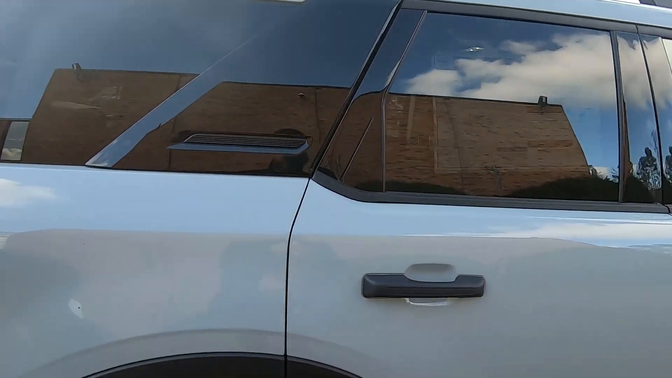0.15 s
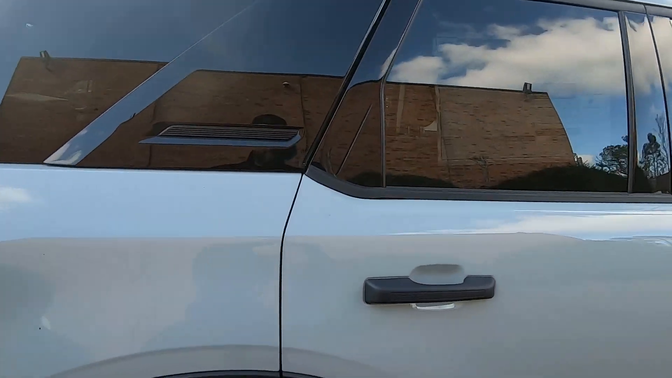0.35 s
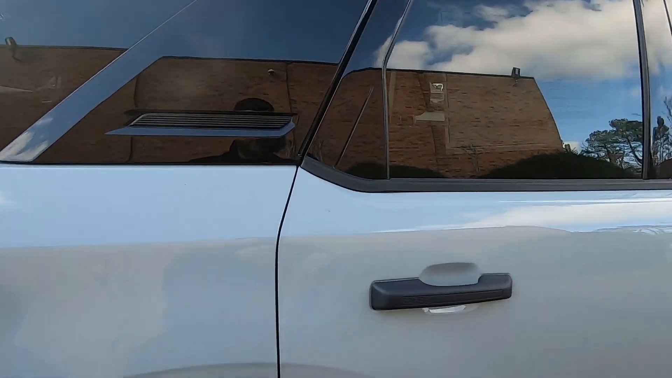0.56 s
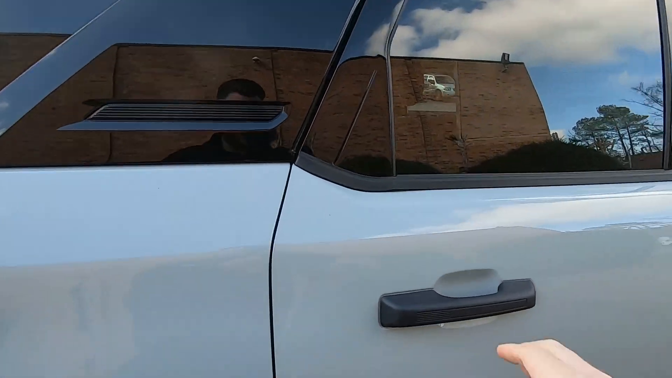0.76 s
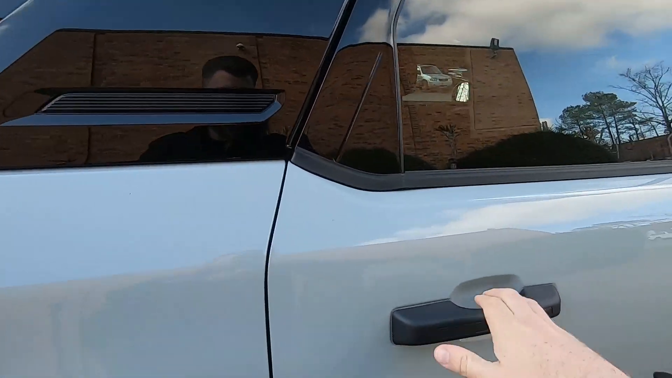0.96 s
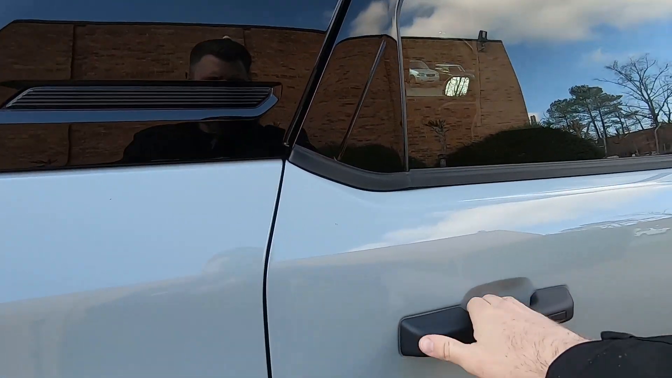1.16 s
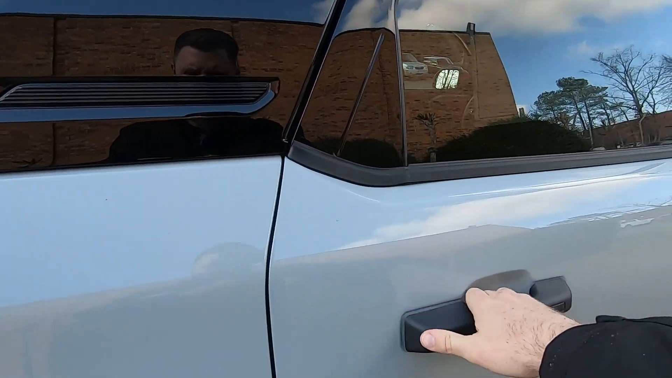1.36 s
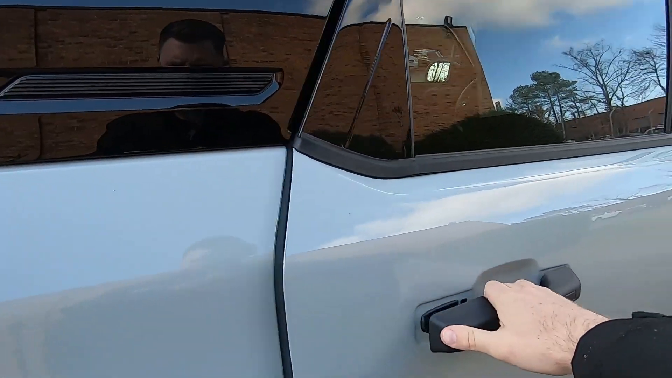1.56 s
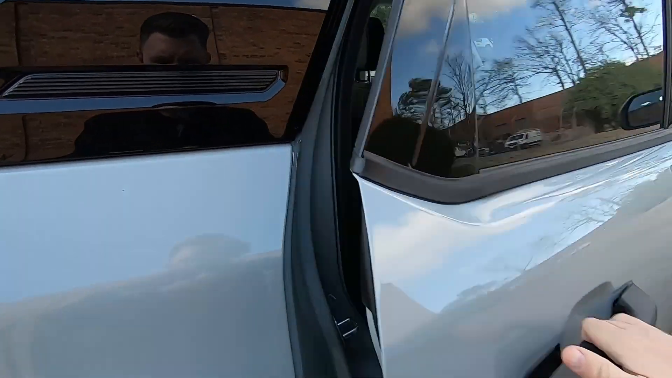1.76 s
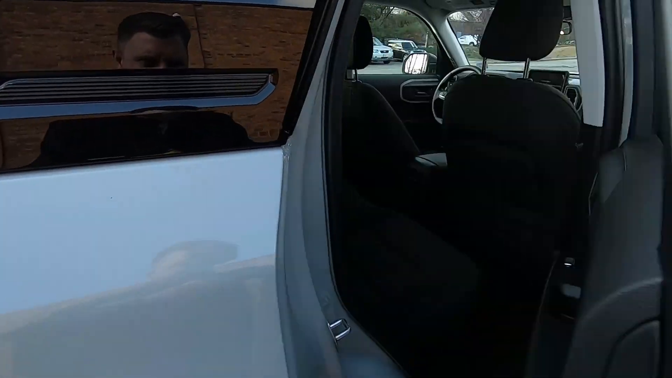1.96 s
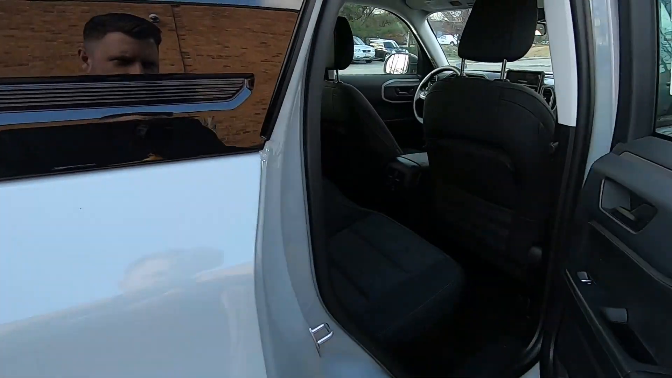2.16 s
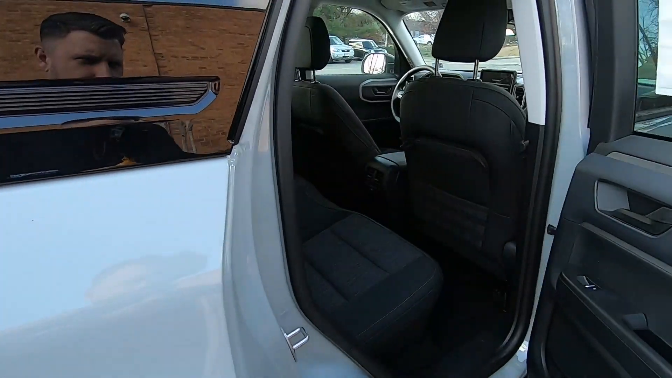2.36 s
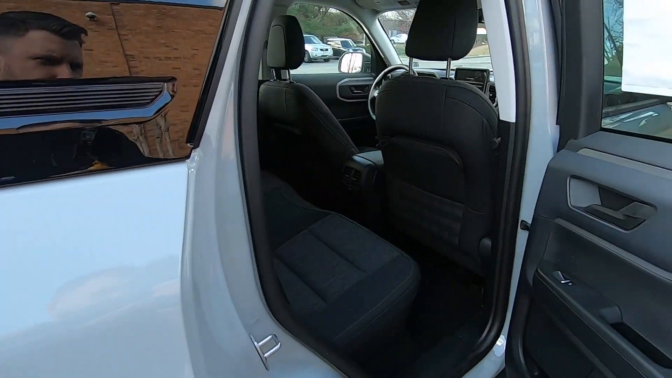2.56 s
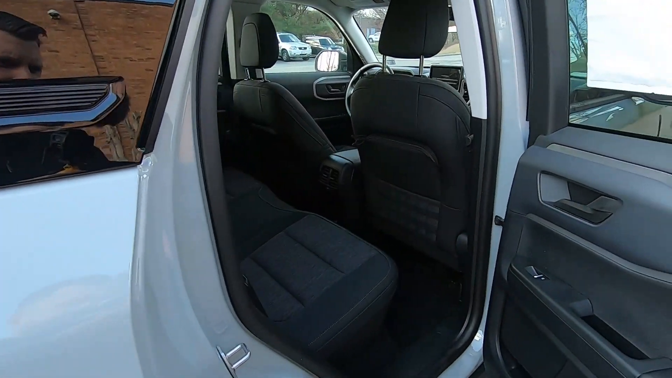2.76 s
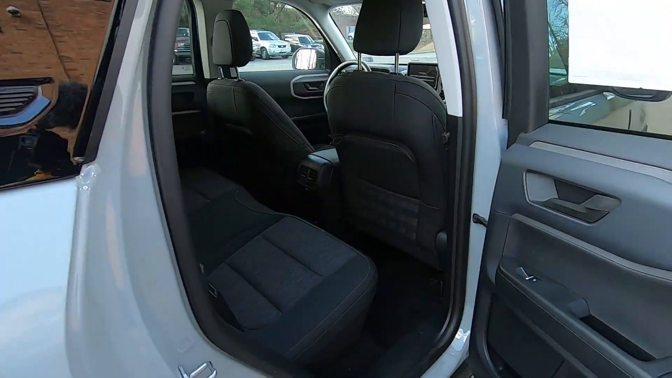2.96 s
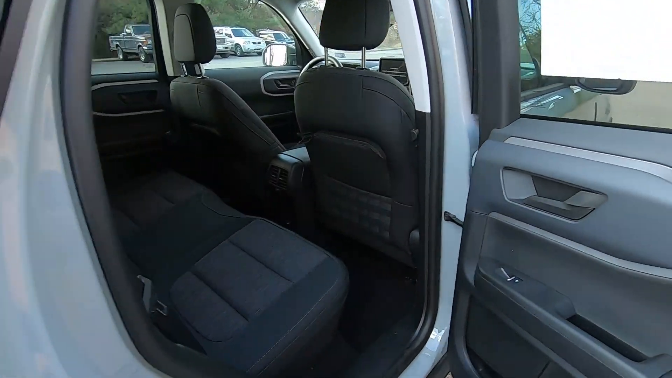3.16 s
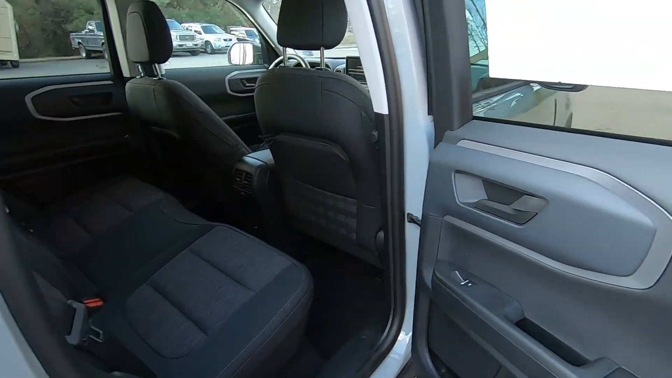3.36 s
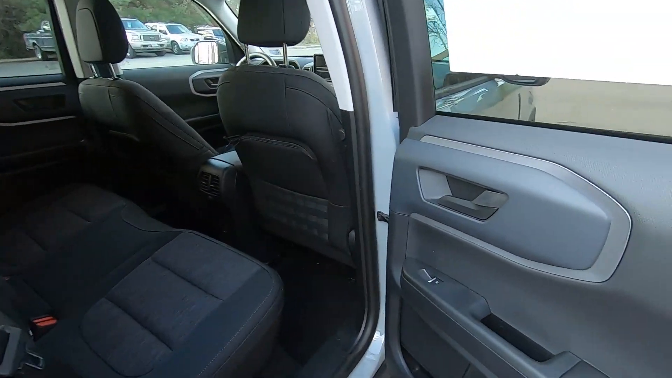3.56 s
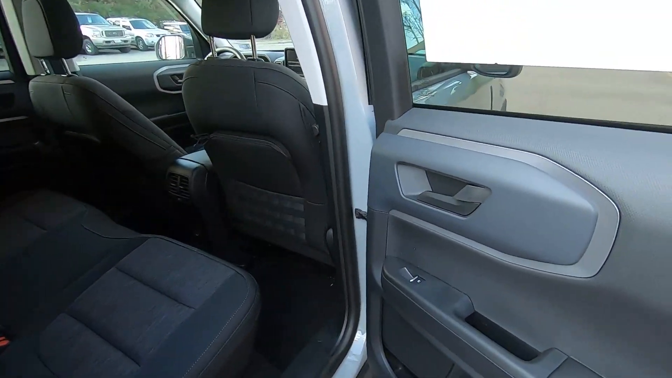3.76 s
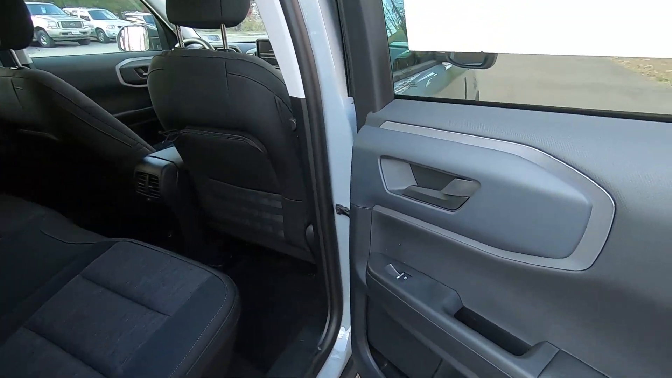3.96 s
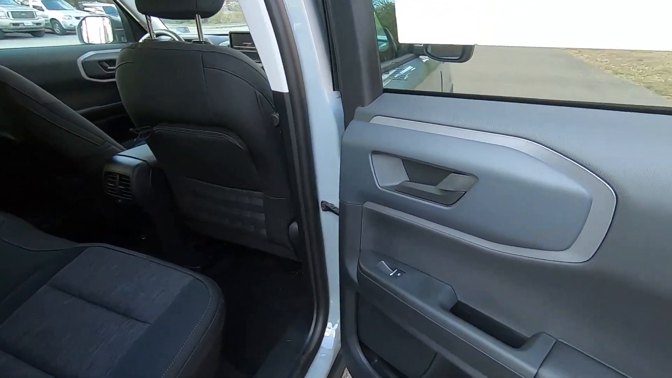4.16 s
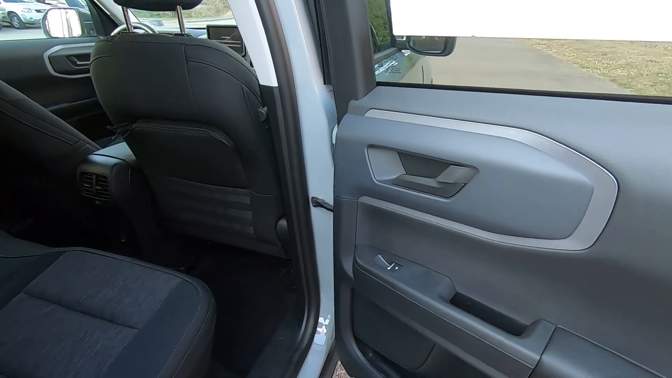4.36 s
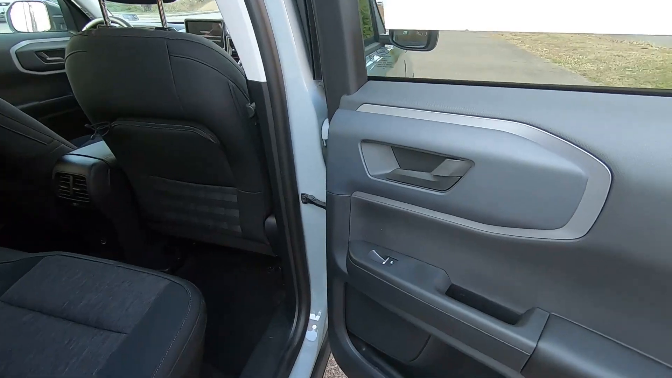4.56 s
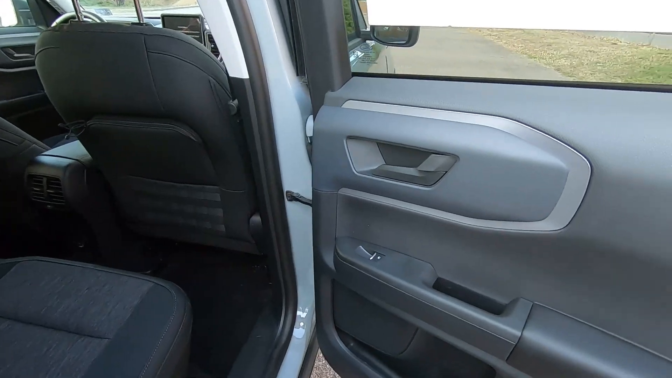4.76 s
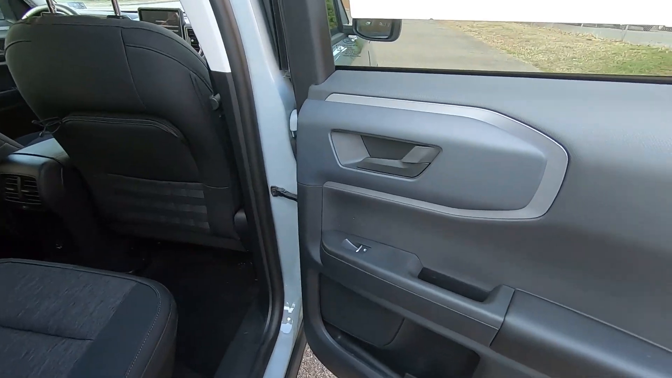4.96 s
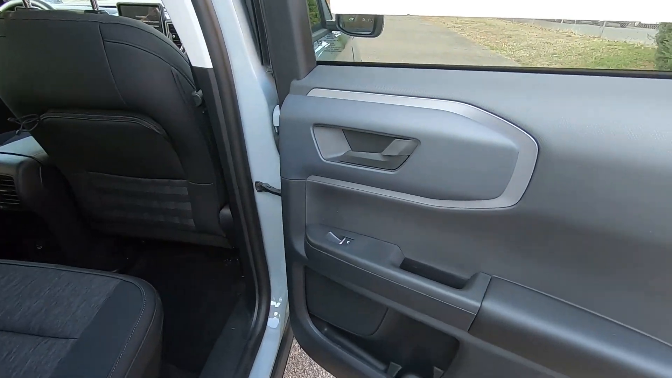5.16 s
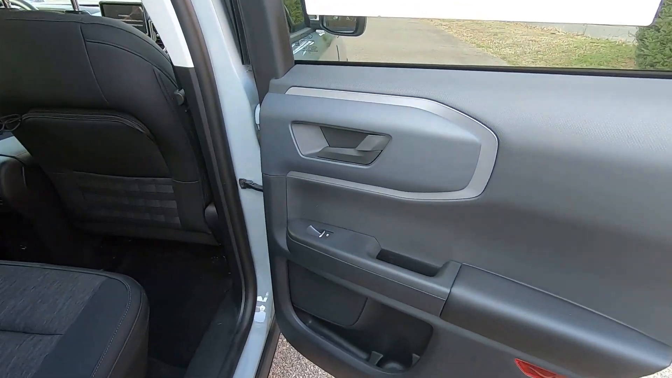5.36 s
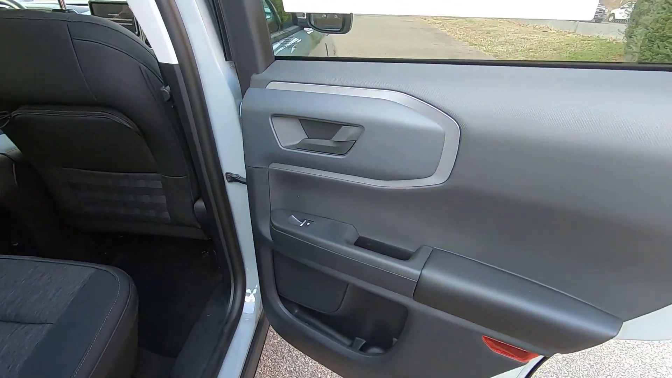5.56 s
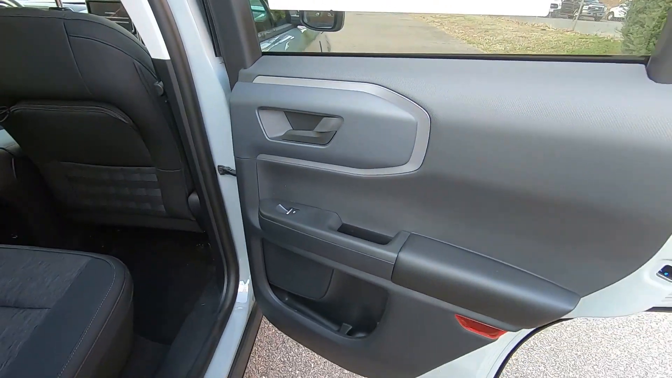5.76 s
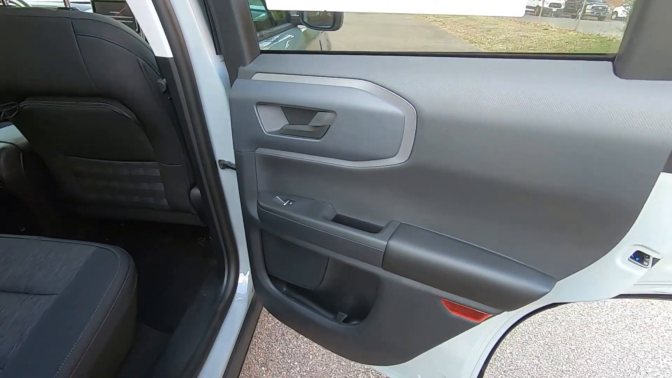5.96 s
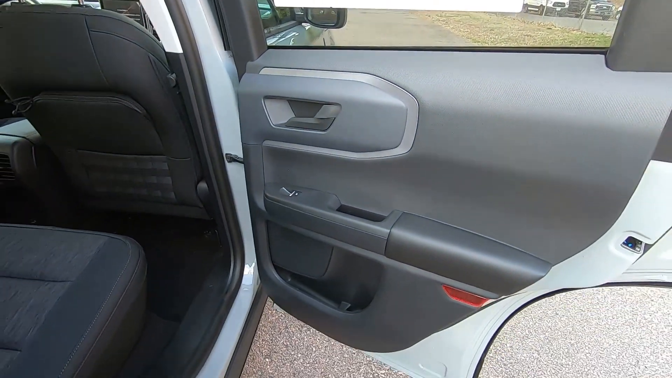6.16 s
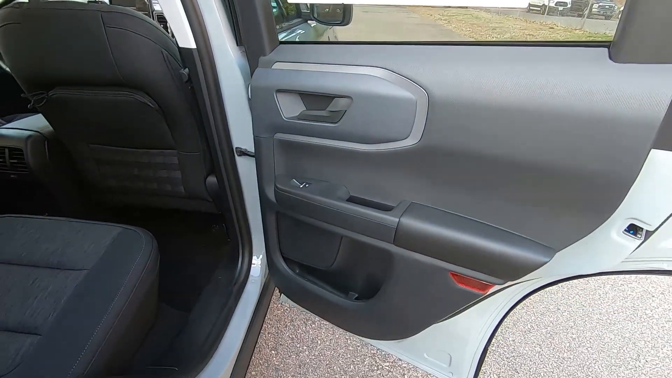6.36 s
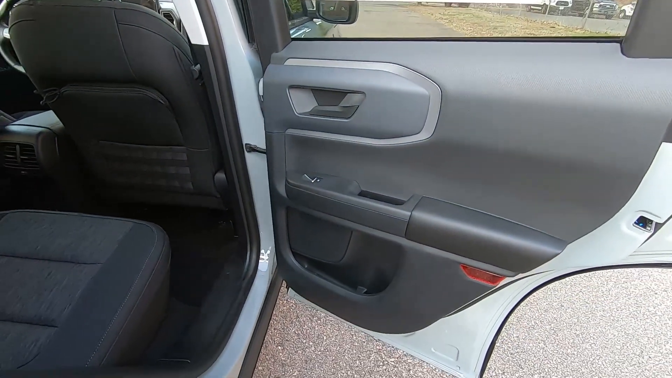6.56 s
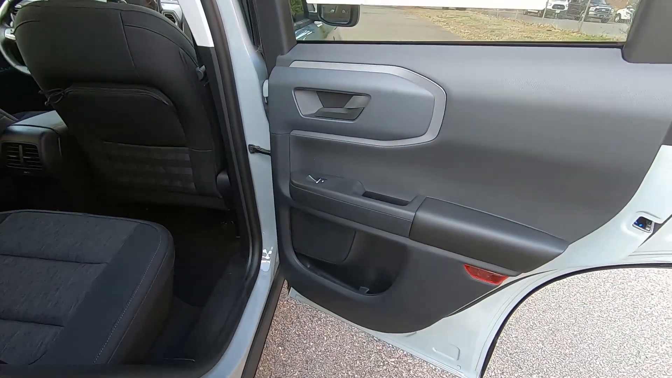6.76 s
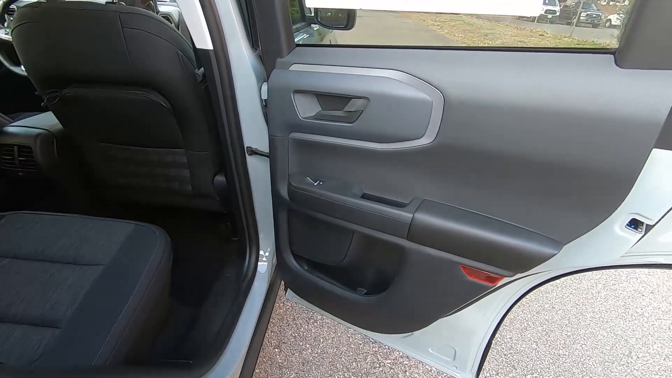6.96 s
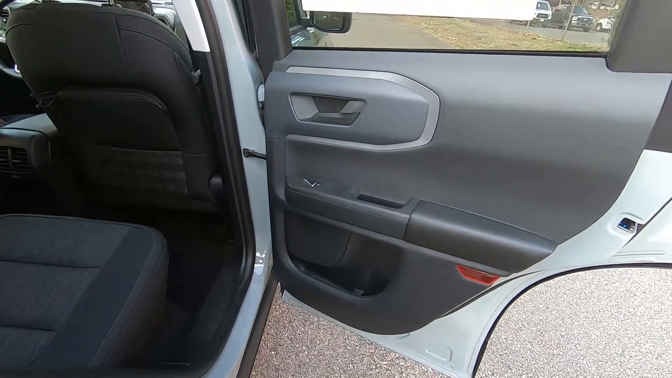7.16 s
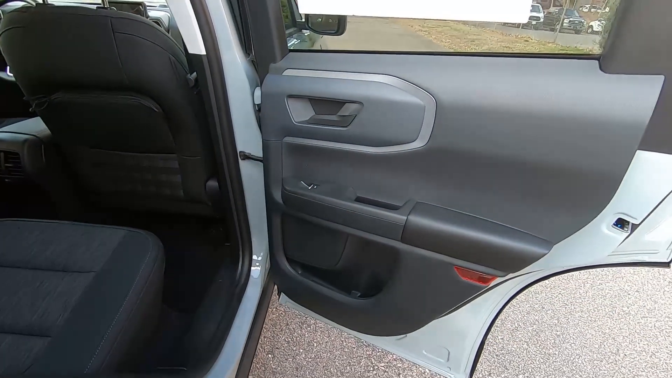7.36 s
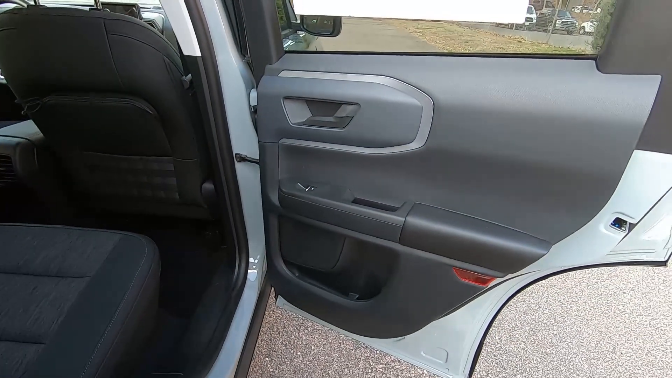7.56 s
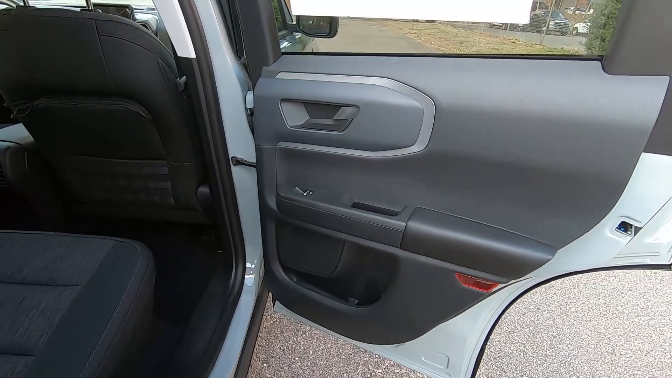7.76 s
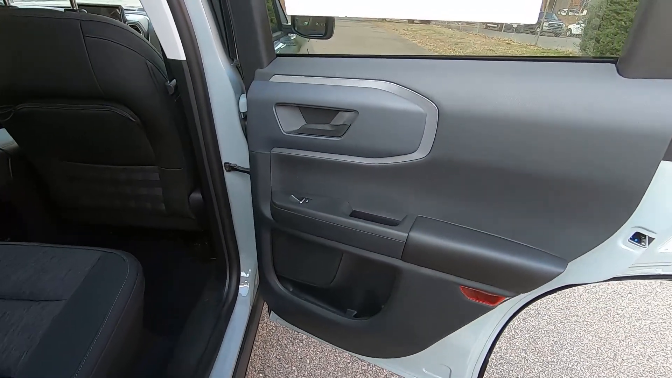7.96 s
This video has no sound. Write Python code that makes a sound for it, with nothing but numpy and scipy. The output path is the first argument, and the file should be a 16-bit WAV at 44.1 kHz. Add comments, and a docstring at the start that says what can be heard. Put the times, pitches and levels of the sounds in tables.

```python
"""Outdoors beside a car: a hand pulls a door handle, the latch lets go with a thud, the door swings onto its stop.
The door is blows ringing panel modes; handle, latch and camera casing tick as noise snaps through plastic modes.
Hand, seal and cloth rub as dense slips; the grip on a handheld camera is low noise bands, jolts and soft booms.
Slow noise sways the microphone, banded noise makes the far traffic, and a wavering sine is a far engine's hum."""
import sys
import numpy as np
from scipy import signal
from scipy.io import wavfile

SR = 44100
rng = np.random.default_rng(int(sys.argv[2]) if len(sys.argv) > 2 else 0)


def transcribe(signal):
    """Save signal, clipped to [-1, 1], as a 16-bit WAV file at the path in sys.argv[1]."""
    frames = np.atleast_2d(signal).T
    limited = np.clip(frames, -1, 1)
    pcm = np.round(limited * 32767).astype(np.int16)
    wavfile.write(sys.argv[1], SR, pcm)


def volts_from_db(level):
    """Convert decibel levels to linear amplitude ratios."""
    exponent = np.asarray(level, float) / 20
    return 10 ** exponent


N = 353373

# Plastic modes that ticks and rubs excite. Each row: pitch in Hz, width in Hz, gain in dB.
PLASTIC_MODES = [(1270, 190, -0.5), (1520, 135, 9), (1705, 66, 2), (1950, 227, 4.5), (2350, 510, -5.5),
                 (2650, 190, 0), (3200, 620, -12)]


def rms_one(x):
    """Scales a signal to an rms of 1."""
    return x / np.sqrt(np.mean(x ** 2) + 1e-20)


def in_time(rows):
    """Reads the columns of a table at every sample, in straight lines between the rows."""
    s, *columns = np.transpose(rows)
    return [np.interp(np.arange(N) / SR, s, c) for c in columns]


def band(x, low_hz, high_hz, order=2):
    """Butterworth bandpass."""
    sos = signal.butter(order, [low_hz, high_hz], "band", fs=SR, output="sos")
    return signal.sosfilt(sos, x)


def noise(low_hz, high_hz, order=2):
    """Band noise of rms 1, with a second of run-in thrown away."""
    return rms_one(band(rng.standard_normal(N + SR), low_hz, high_hz, order)[SR:])


def drift(rate_hz):
    """Slow random wander of rms 1: noise through two equal poles, made at every 40th sample."""
    r = np.exp(-80 * np.pi * rate_hz / SR)
    white = rng.standard_normal(N // 40 + 2002)
    slow = signal.lfilter([1], [1, -2 * r, r * r], white)[2000:]
    return np.interp(np.arange(N) / 40, np.arange(len(slow)), rms_one(slow))


def swells(top_s, hold_s, top_db, rise, fall):
    """Level in dB of the loudest of many rise-hold-fall shapes; slopes in dB per second."""
    t = np.arange(0, N, 40) / SR
    level_db = -150
    for s, hold, db in np.broadcast(top_s, hold_s, top_db):
        before, after = np.maximum(s - t, 0), np.maximum(t - s - hold, 0)
        level_db = np.maximum(level_db, db - rise * before - fall * after)
    return np.interp(np.arange(N) / SR, t, level_db)


def resonate(x, hz, width_hz):
    """One ringing mode: a two-pole resonance."""
    r = np.exp(-np.pi * width_hz / SR)
    poles = [1, -2 * r * np.cos(2 * np.pi * hz / SR), r * r]
    return signal.lfilter([(1 - r * r) / 2, 0, (r * r - 1) / 2], poles, x)


def sway():
    """Slow air pressure on the microphone: noise of a few hertz with an uneven level."""
    # Each row: time in seconds, relative level in dB.
    sway_level = [(0.0, -21.5), (0.54, -26.5), (1.09, -20), (1.61, -38), (1.76, -25), (1.95, -38),
                  (2.07, -18), (2.39, -21), (2.56, -31), (3.55, -29.5), (3.88, -18), (4.19, -37),
                  (4.75, -33), (6.25, -35), (6.45, -25), (6.98, -38.5), (7.47, -33.5), (8.01, -38.5)]
    slow = noise(2.2, 8.37) + volts_from_db(-12.0) * noise(7.7, 22.0, order=3)
    # a steep lowpass keeps it below the audible bass
    slow = signal.sosfilt(signal.butter(8, 20, fs=SR, output="sos"), slow)
    return volts_from_db(in_time(sway_level)[0]) * slow


def traffic():
    """Far traffic hiss: half-octave bands of smooth noise, each wandering a little in level."""
    # Colour of the traffic. Each row: frequency in Hz, relative density in dB per Hz.
    colour = np.array([(35, -31), (60, -0.5), (91, -5.5), (108, -6), (217, -24), (262, -26), (566, -20.5),
                       (785, -19.5), (1550, -27), (2580, -37), (2840, -41), (3120, -37), (7940, -41.5),
                       (16000, -46)])
    # Course of the traffic. Each row: time in seconds, relative level in dB, lift near 2.7 kHz in dB.
    course = [(0.0, -63.5, 9), (0.33, -61.5, 5), (1.2, -60.5, 3), (1.61, -59, 3), (2.3, -61.5, 0),
              (3.01, -64, 1.5), (3.39, -62.5, -0.5), (4.01, -63.5, 2), (4.33, -62.5, 0.5),
              (5.64, -63.5, 1.5), (6.11, -62.5, 2), (7.03, -63, -0.5), (8.01, -62, -0.5)]
    level_db, lift_db = in_time(course)
    log_hz, density_db = np.log(colour[:, 0]), colour[:, 1]
    reference_db = np.interp(np.log(900), log_hz, density_db)
    edges = 60 * 2 ** np.arange(0, 8.6, .5)
    white = rng.standard_normal((2, N))     # neighbouring bands take turns, so they stay independent
    out = 0
    for k, (low, high) in enumerate(zip(edges, edges[1:])):
        hz = np.sqrt(low * high)
        db = np.interp(np.log(hz), log_hz, density_db) - reference_db
        share = np.exp(-np.log2(hz / 2700) ** 2 / 0.31)      # nearer traffic hisses more around 2-4 kHz
        gain = volts_from_db(db + share * lift_db + 1.0 * drift(5.2))
        out = out + gain * band(white[k % 2], low, min(high, .45 * SR))
    return volts_from_db(level_db + 12.5) * out


def grip():
    """The hand's strain on the camera: low muscle shake with jolts, and the boom of the casing, both lumpy."""
    # Steady strain. Each row: time in seconds, relative shake level in dB, relative casing boom level in dB.
    strain = [(0.0, -34.5, -48.5), (0.14, -34, -47), (0.24, -51, -60.5), (0.6, -58, -60.5),
              (0.76, -50, -54.5), (0.9, -56, -58), (1.4, -50, -56.5), (1.6, -54, -52.5), (1.9, -60, -60.5),
              (2.25, -50, -60), (2.6, -58, -65.5), (3.05, -54, -66), (3.18, -55, -59), (3.4, -49.5, -64.5),
              (3.95, -50, -62.5), (4.15, -55.5, -68), (7.5, -59.5, -68.5), (8.01, -55, -63.5)]
    # Jolts of the hand, brief swells of the shake. Each row: time in seconds, relative top level in dB.
    jolts = [(0.79, -34.5), (1.13, -36), (1.24, -39), (1.35, -44), (1.61, -35), (2.01, -48), (2.159, -35),
             (3.04, -50), (3.17, -47), (3.5, -34), (3.7, -40), (3.92, -39), (4.28, -42.5), (4.72, -49),
             (5.34, -54)]
    shake_db, boom_db = in_time(strain)
    lumps = 1.5 * drift(4)
    jolt_s, jolt_db = np.transpose(jolts)
    jolt_level_db = swells(jolt_s, 0, jolt_db, rise=261, fall=220)
    shake_db = np.maximum(shake_db + lumps, jolt_level_db)
    tremor = noise(35.4, 61.0, order=4) + volts_from_db(-15) * noise(26.4, 35.0, order=3)
    shake = tremor * volts_from_db(shake_db + 2.0 * drift(2.4))
    boom = noise(121.0, 274) * volts_from_db(boom_db + 0.74 * lumps + 2.0 * drift(35))
    return shake + boom


def bumps():
    """Bumps of the grip against the casing: each a short sine boom with a soft onset."""
    # Each row: start in seconds, relative strength in dB, boom pitch in Hz.
    bump_rows = [(0.016, -35, 158), (0.048, -25, 214), (0.074, -29, 213), (0.114, -30.5, 240),
                 (0.139, -30.5, 197), (0.17, -33, 206), (0.693, -27.5, 215), (0.724, -37, 163),
                 (0.862, -46, 220), (0.976, -40, 206), (1.101, -42, 204), (1.149, -37, 217),
                 (1.262, -30.5, 161), (1.318, -41, 232), (2.654, -39, 160), (3.489, -31.5, 184),
                 (3.801, -40.5, 167), (3.888, -47, 164)]
    out, t = np.zeros(N), np.arange(SR // 5) / SR
    onset = 1 - np.exp(-t / 0.0084)
    for s, strength_db, hz in bump_rows:
        at = round(s * SR)
        decay = volts_from_db(strength_db + 4.0 - 60 * t / 0.045)
        out[at:at + len(t)] += onset * decay * np.sin(2 * np.pi * hz * t)
    return out


def plastic(x):
    """Short plastic modes in parallel, of alternating sign, over a broad middle."""
    modes = 0
    for k, (hz, width_hz, db) in enumerate(PLASTIC_MODES):
        modes = modes + (-1) ** k * volts_from_db(db) * resonate(x, hz, width_hz)
    return modes + volts_from_db(3) * band(x, 970, 3400)


def rubs():
    """Strokes of hand, seal and cloth: dense uneven slips, clumped, through the plastic and a bright hiss."""
    # Each row: start in seconds, hold in seconds, relative body level in dB, relative bright level in dB.
    strokes = [(0.03, 0.12, -66, -77), (0.545, 0.16, -65, -74), (1.175, 0.043, -62, -65),
               (1.418, .03, -54, -57), (1.441, .015, -41, -59), (1.59, .025, -41.5, -53),
               (1.64, 0.051, -48, -60), (2.123, .03, -58, -70), (2.167, 0.0065, -34.5, -50.5),
               (2.635, 0.036, -56, -61), (2.738, 0.082, -65, -61.5), (3.069, 0.026, -63, -56.5),
               (3.124, 0.02, -42, -56), (3.418, 0.23, -68, -67.5), (4.984, 0.0044, -54, -69),
               (5.018, 0.02, -48.5, -53), (5.055, .004, -52, -64), (5.445, .09, -78, -66.5),
               (5.585, 0.012, -55.5, -72), (5.862, .03, -62, -65), (6.25, 0.053, -56, -72),
               (6.334, 0.028, -62, -70)]
    start, hold, *levels = np.transpose(strokes)
    # full level comes 11 ms after the start
    body_db, bright_db = [swells(start + 0.011, hold, db, rise=1500, fall=500) for db in levels]
    slips_per_s = 6000
    slips = (rng.random(N) < slips_per_s / SR) * rng.standard_normal(N)
    slips = slips * volts_from_db(1.0 * drift(77))
    body = rms_one(band(plastic(slips), 1000, 3900) + volts_from_db(5.5) * band(slips, 360, 920))
    bright = rms_one(band(slips, 2460, 4140) + volts_from_db(-11.0) * band(slips, 5000, 11300))
    return volts_from_db(body_db - 6.0) * body + volts_from_db(bright_db - 5.5) * bright


def crackle():
    """Faint casing ticks, as tick rows, at uneven moments within each run, of chance pitch and strength."""
    # Each row: start in seconds, length in seconds, ticks per second, relative level in dB.
    runs = [(0.034, .14, 75, -56.5), (0.729, .07, 32, -61), (1.181, .15, 20, -60.5), (2.661, .14, 60, -63),
            (3.062, .09, 28, -55), (3.419, .1, 31, -58)]
    rows = []
    for start, length, rate, db in runs:
        slots = np.arange(0, length, 1 / rate)
        when, pitch = rng.random((2, 40))[:, :len(slots)]
        ring, dull, bright = db + 2.5 * rng.standard_normal((3, 40))[:, :len(slots)]
        rows += zip(start + slots + when / rate, ring, 1300 * 2.2 ** pitch, dull + 2, bright + 1)
    return rows


def ticks():
    """Snaps of fast dying noise that ring most the modes near their own pitch, with broad parts beside."""
    # Clear ticks of handle, latch and camera casing. Each row: start in seconds, relative ring level in dB,
    # ring pitch in Hz, relative dull level in dB, relative bright level in dB.
    clear_ticks = [(0.552, -49.5, 1790, -42.5, -51), (0.5644, -41.5, 1270, -45, -53),
                   (0.6, -42.5, 1270, -61, -50), (0.624, -51, 2300, -60, -64),
                   (0.691, -46.5, 1720, -51, -42.5), (1.2584, -46.5, 2500, -55, -58),
                   (1.3795, -47, 1990, -50, -56), (1.3921, -57, 1860, -65, -56),
                   (1.4159, -36.5, 1970, -37.5, -60), (1.4265, -58, 2520, -45, -41),
                   (1.4452, -39.5, 1920, -47, -49), (1.4532, -47, 2110, -35, -34),
                   (1.491, -56, 1630, -46, -63), (1.596, -39.5, 1480, -42, -39), (1.6, -31, 2770, -31, -44),
                   (1.6115, -49, 1440, -27, -42), (1.6178, -47, 1450, -28, -48),
                   (1.627, -46, 2670, -42, -40.5), (1.6325, -25, 2350, -24.5, -47),
                   (1.638, -42, 1420, -37, -47), (1.6466, -47, 1260, -28, -47),
                   (1.667, -63, 1530, -32, -51), (1.6792, -36.5, 2380, -33, -55),
                   (1.6931, -47, 2520, -33, -53), (1.7195, -61, 1360, -51, -55),
                   (2.1416, -46, 1260, -43.5, -68), (2.1786, -34.5, 2210, -33.5, -47),
                   (2.1802, -41, 1240, -29, -46), (2.2326, -49, 1260, -40.5, -54),
                   (2.6417, -53, 1530, -48, -55), (2.8217, -36.5, 2010, -55, -59),
                   (2.9549, -58.5, 2000, -66, -54.5), (3.081, -57, 1950, -67, -51),
                   (3.0977, -44, 2050, -56, -55), (3.1308, -43, 1650, -60, -49),
                   (3.1349, -31.5, 2100, -46, -54), (3.153, -39, 2180, -42, -49),
                   (3.555, -55, 2000, -59, -57), (3.61, -57, 1430, -48, -54),
                   (3.799, -50, 1750, -63, -56.5), (3.8646, -57, 2870, -63, -54.5),
                   (4.104, -49, 2240, -63, -53.5), (4.1694, -47, 1510, -48, -57.5),
                   (4.335, -52, 1580, -63, -48.5), (4.3505, -43, 1450, -55, -53.5),
                   (4.4937, -45, 1440, -51, -56), (4.511, -53, 1500, -58, -58),
                   (4.753, -53, 1500, -55, -45), (4.7985, -46, 1970, -51, -50.5),
                   (5.025, -45, 1470, -58, -57), (5.0355, -39.5, 1650, -48, -46),
                   (5.0447, -34.5, 1760, -48, -46), (5.064, -37, 1710, -63, -56),
                   (5.071, -37, 1710, -48, -49), (5.447, -52, 2500, -64, -58),
                   (5.5522, -53, 1820, -72, -51), (5.5887, -45.5, 2650, -67, -48),
                   (5.624, -52.5, 1880, -64, -55), (5.8648, -56, 1920, -50, -53),
                   (5.8812, -55, 1700, -50, -49.5), (5.9817, -55, 1434, -59, -62),
                   (6.0614, -54, 1420, -69, -62), (6.247, -53, 1590, -43.5, -59),
                   (6.2887, -47.5, 1520, -60, -52.5), (6.3468, -41.5, 1920, -54, -48),
                   (6.6344, -30, 1600, -29, -43.5), (6.822, -45, 2020, -48, -45),
                   (7.6217, -43, 2270, -52, -50.5), (7.9443, -47.5, 1830, -43.5, -60)]
    modes_hz, t = np.array(PLASTIC_MODES)[:, 0], np.arange(SR // 20) / SR
    # parts in order: dull, bright, airy, then one for each plastic mode
    force = np.full((3 + len(PLASTIC_MODES), N + SR), 1e-9)
    t60 = np.r_[.035, .022, .018, np.full(len(PLASTIC_MODES), .022)]     # airy treble dies first
    fall = volts_from_db(-60 * t / t60[:, None])
    hardness = np.r_[.9, .45, .3, np.full(len(PLASTIC_MODES), .9)]      # strength of the clean click
    click = hardness * np.sqrt(np.sum(fall ** 2, axis=1))
    for s, ring_db, ring_hz, dull_db, bright_db in [*clear_ticks, *crackle()]:
        near_db = np.maximum(-22 * np.abs(np.log2(modes_hz / ring_hz)), -12)
        strength = volts_from_db(np.r_[dull_db, bright_db, bright_db - 6, ring_db + near_db])
        at = round(s * SR)
        snap = fall * rng.standard_normal((len(fall), len(t)))
        snap[:, 0] = click      # the first contact is one hard click
        bounce = round(rng.uniform(0.00149, 0.0043) * SR)
        # the part bounces once
        snap[:, bounce:] += volts_from_db(-6) * snap[:, :-bounce].copy() * rng.choice([-1, 1])
        force[:, at:at + len(t)] += strength[:, None] * snap
    dull, bright, airy, *struck = force[:, :N]
    rings = sum(volts_from_db(db) * resonate(x, hz, width_hz) for x, (hz, width_hz, db) in zip(struck, PLASTIC_MODES))
    dull = volts_from_db(7) * band(dull, 434, 1200, order=3)
    rings = volts_from_db(7) * band(rings, 720, 2810)
    bright = volts_from_db(4) * band(resonate(bright, 2500, 3100), 3180, 8500, order=3)
    airy = volts_from_db(1.5) * band(resonate(airy, 7700, 9000), 7600, 22000)
    return dull + rings + bright + airy


def door():
    """Each blow is a soft push that strikes every panel mode with a chance strength of its own."""
    # Blows into the door panel. Each row: start in seconds, relative strength in dB, softness in ms.
    blows = [(1.423, -39, 0.44), (1.5942, -12.5, 1.32), (1.606, -16.5, 1.5), (1.63, -30, 0.14),
             (1.645, -27, 0.41), (1.68, -35, 0.41), (2.175, -34.5, 0.27), (2.182, -24, 0.84),
             (2.2, -26.5, 1.15), (3.148, -33.5, 1.2)]
    # Door panel modes. Each row: pitch in Hz, gain in dB, t60 in seconds.
    panel_modes = [(76, -10.5, 0.15), (150, 0.5, 0.143), (186, 3, 0.088), (215, -1.5, 0.13),
                   (308, 1.5, 0.16), (351, 6, 0.17), (392.5, 2, 0.1), (537, -1.5, 0.083), (695, -4, 0.13),
                   (770, 2, 0.06), (960, -6, 0.07), (1240, -1, 0.07), (2080, -7, .05), (2630, 0, .07)]
    out, t = np.zeros(N), np.arange(SR // 2) / SR
    onset = 1 - np.exp(-t / 0.0011)
    for s, strength_db, soft_ms in blows:
        spread_db = rng.normal(0, 3.4, len(panel_modes))
        ringing = 0
        for (hz, db, t60), own_db in zip(panel_modes, spread_db):
            reach = 1 / (1 + (hz * soft_ms / 400) ** 2)      # a long contact spares the high modes
            decay = volts_from_db(db + own_db - 60 * t / t60)
            ringing = ringing + reach * decay * np.sin(2 * np.pi * hz * t)
        at = round(s * SR)
        out[at:at + len(t)] -= volts_from_db(strength_db - 7) * ringing * onset
    return out


def hum():
    """A far engine's low tone: a sine of gliding pitch and wavering level, faded in over a second."""
    # Each row: time in seconds, pitch in Hz, relative level in dB.
    engine = [(5.4, 86.6, -60), (5.75, 87.5, -64.5), (7.0, 82.8, -60.5), (8.01, 82.2, -58.5)]
    hz, level_db = in_time(engine)
    fade = np.clip(np.arange(N) / SR - engine[0][0], 0, 1)
    tone = np.sin(2 * np.pi * np.cumsum(hz) / SR)
    return fade * volts_from_db(level_db + 5.0 + 1.6 * drift(3)) * tone


def scene():
    """Sums all the layers into one channel."""
    surroundings = sway() + traffic() + hum()
    handling = grip() + bumps() + rubs() + ticks()
    return (surroundings + handling + door())[None]


def top_cut(x):
    """Nothing passes above the cut-off."""
    return signal.sosfilt(signal.butter(12, 16160, fs=SR, output="sos"), x)


def record(dry):
    """Cuts the top steeply, to 60 dB down from 16.45 kHz."""
    mix = signal.sosfilt(signal.cheby2(12, 60, 16450, fs=SR, output="sos"), dry)
    return top_cut(mix)


dry = scene()
out = record(dry)
transcribe(out)
```